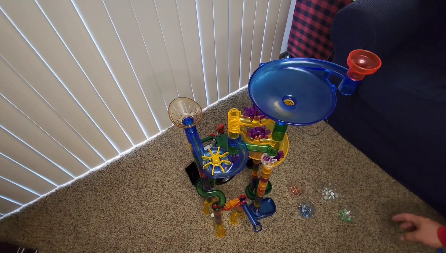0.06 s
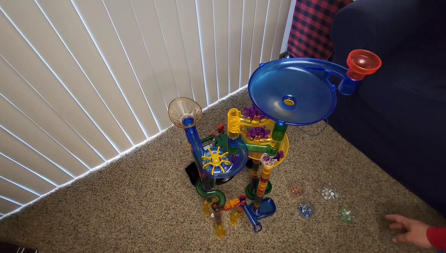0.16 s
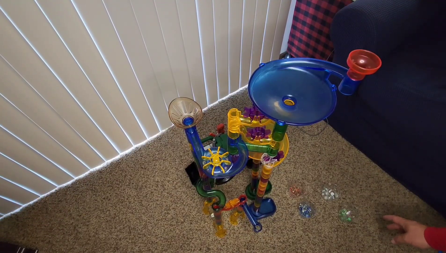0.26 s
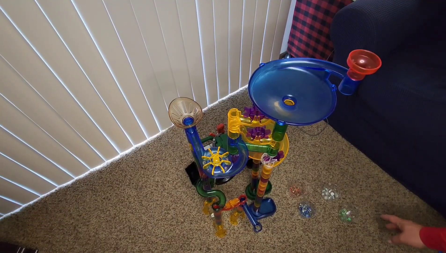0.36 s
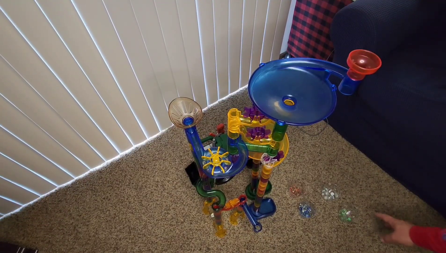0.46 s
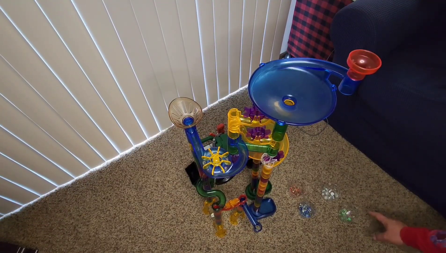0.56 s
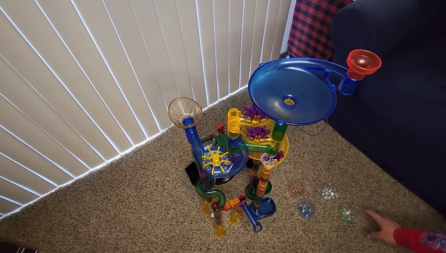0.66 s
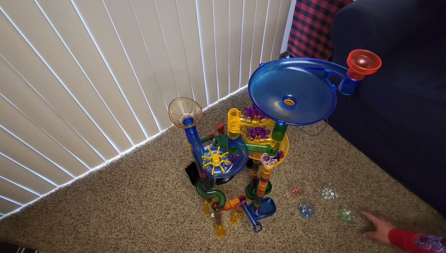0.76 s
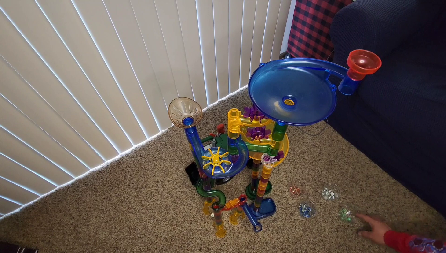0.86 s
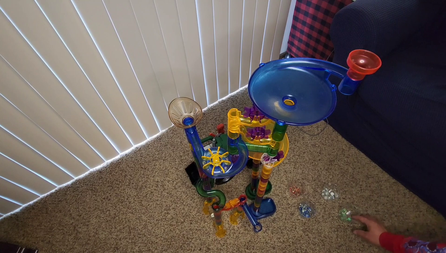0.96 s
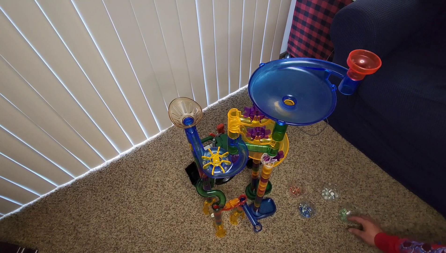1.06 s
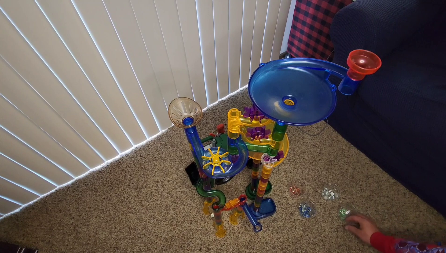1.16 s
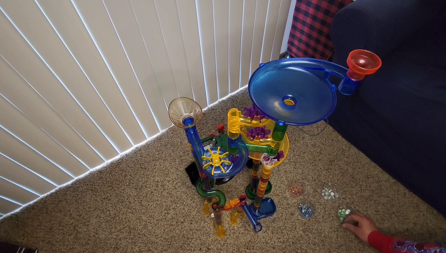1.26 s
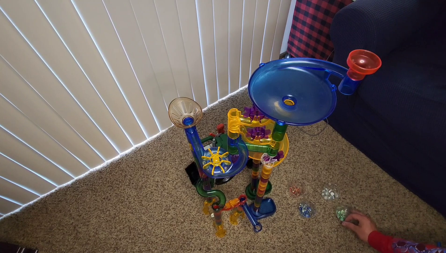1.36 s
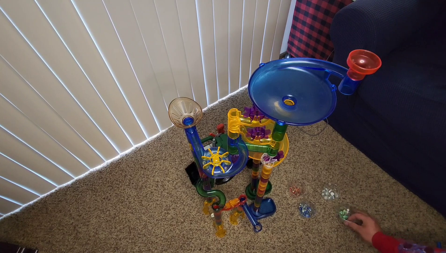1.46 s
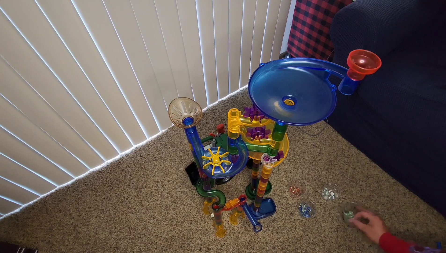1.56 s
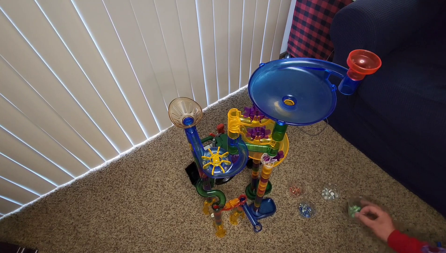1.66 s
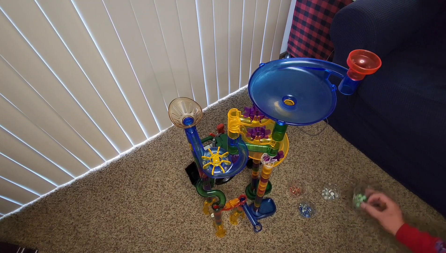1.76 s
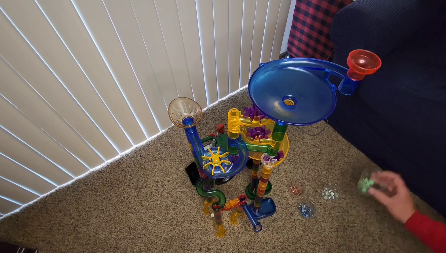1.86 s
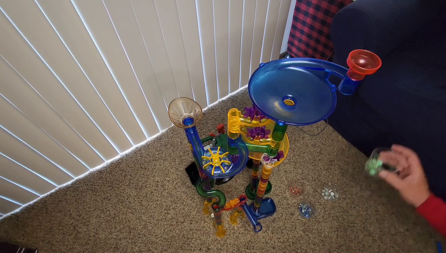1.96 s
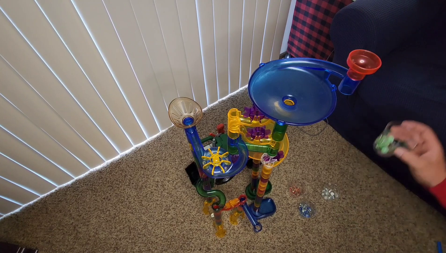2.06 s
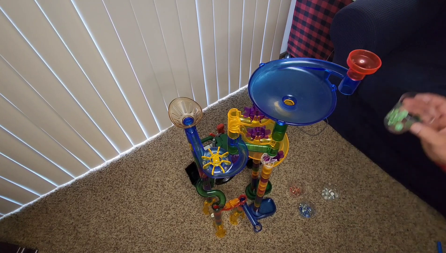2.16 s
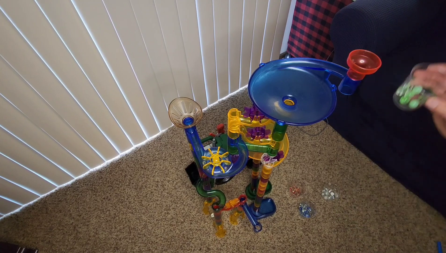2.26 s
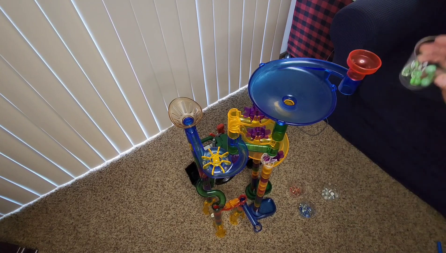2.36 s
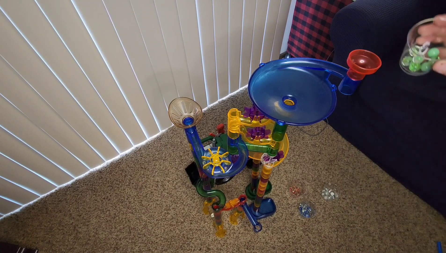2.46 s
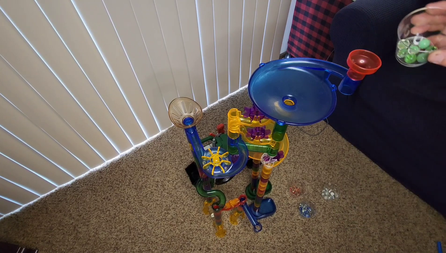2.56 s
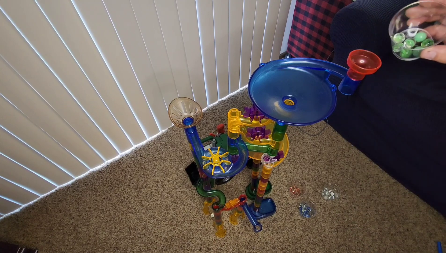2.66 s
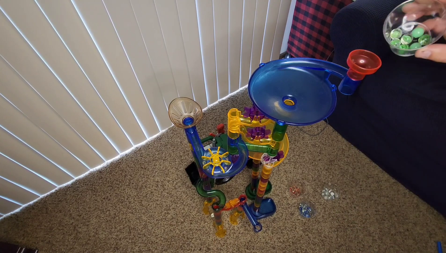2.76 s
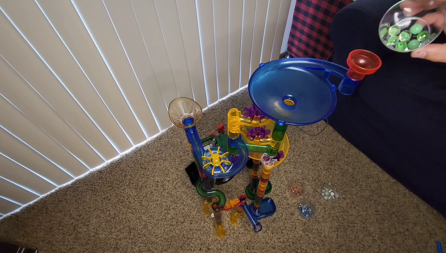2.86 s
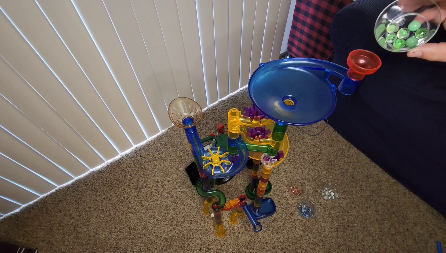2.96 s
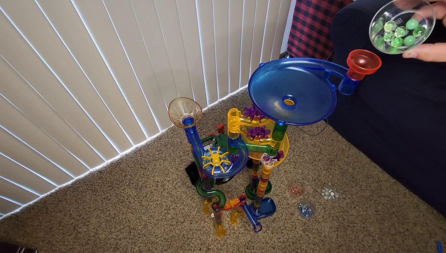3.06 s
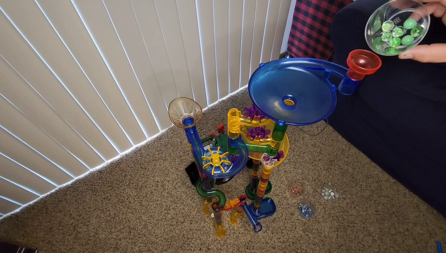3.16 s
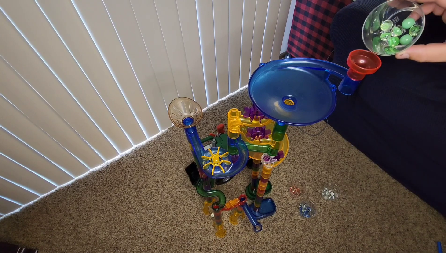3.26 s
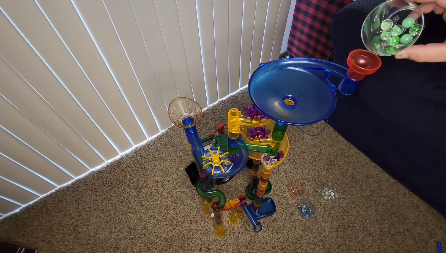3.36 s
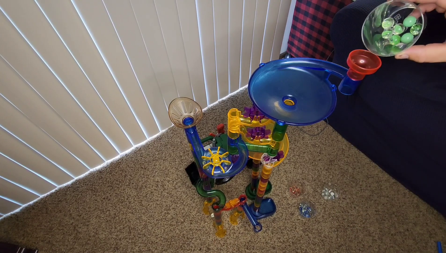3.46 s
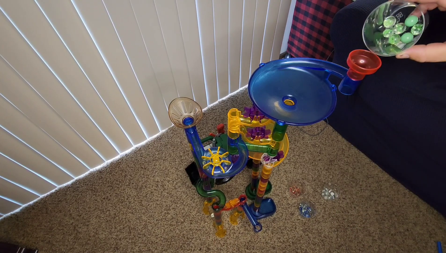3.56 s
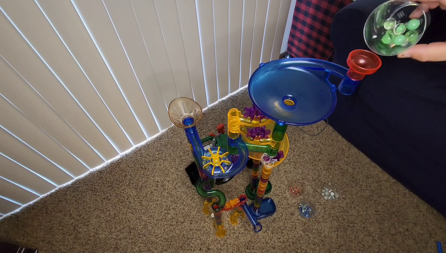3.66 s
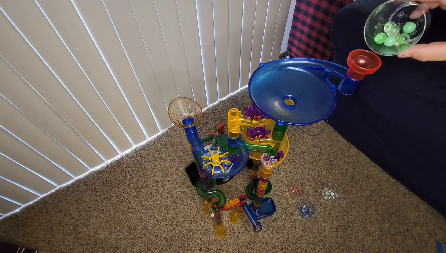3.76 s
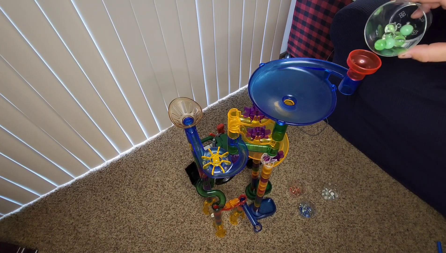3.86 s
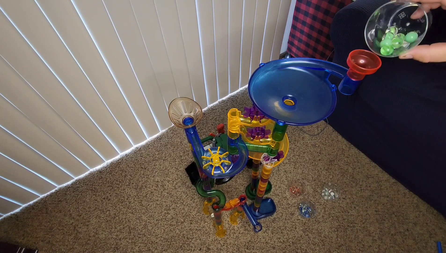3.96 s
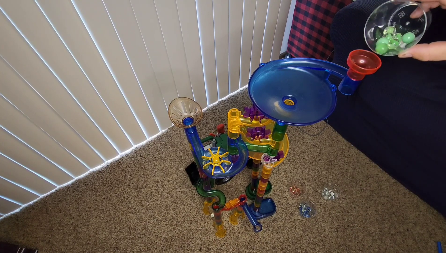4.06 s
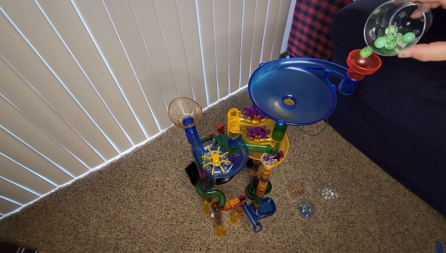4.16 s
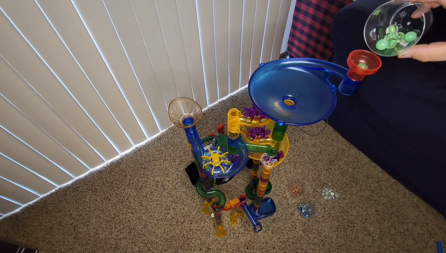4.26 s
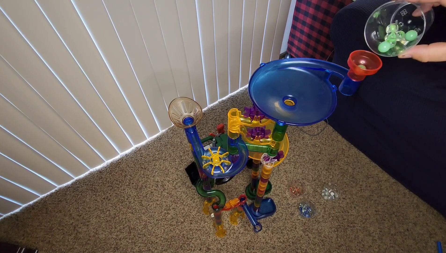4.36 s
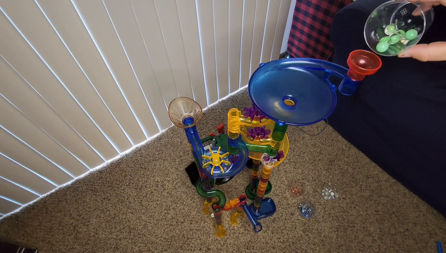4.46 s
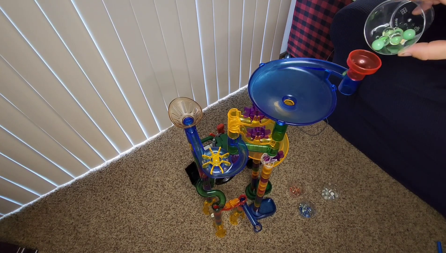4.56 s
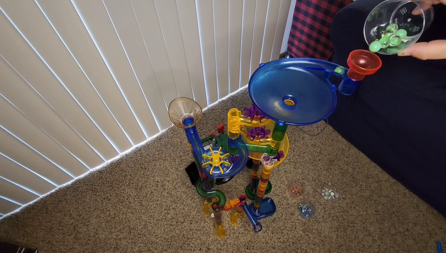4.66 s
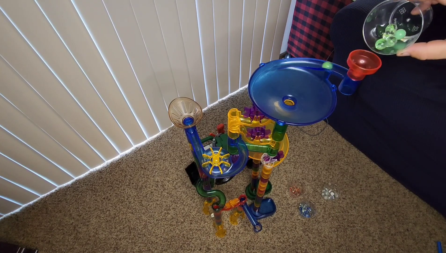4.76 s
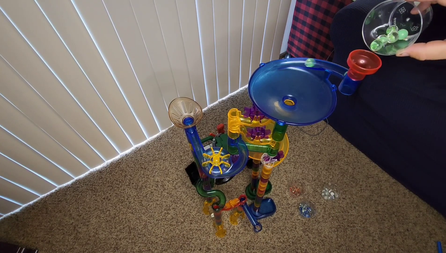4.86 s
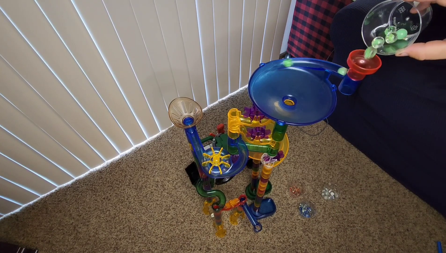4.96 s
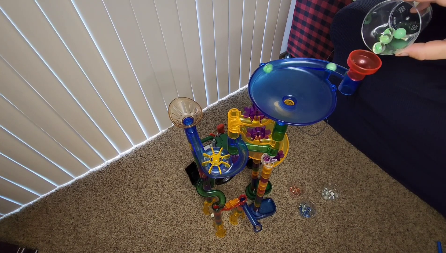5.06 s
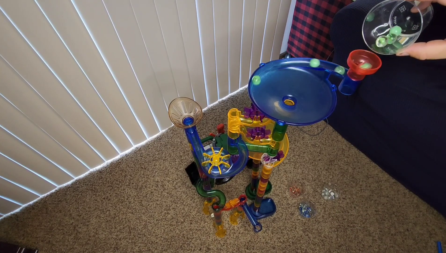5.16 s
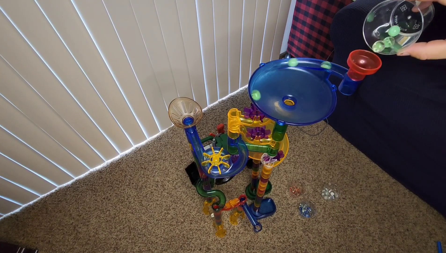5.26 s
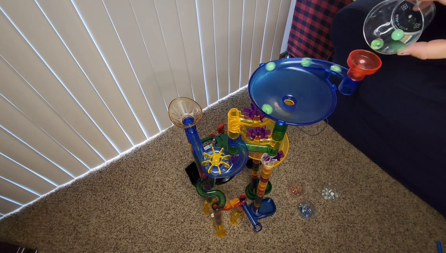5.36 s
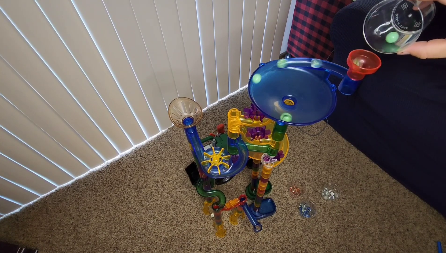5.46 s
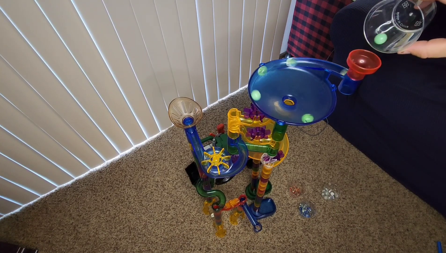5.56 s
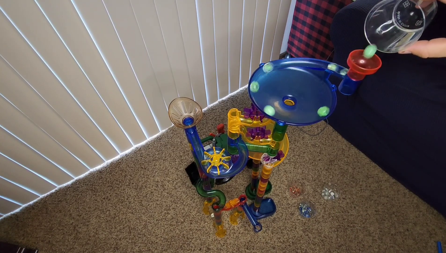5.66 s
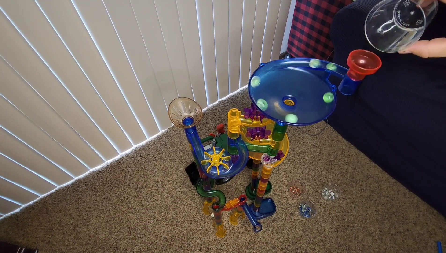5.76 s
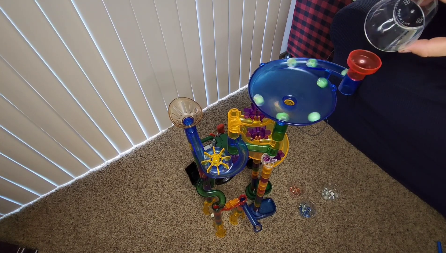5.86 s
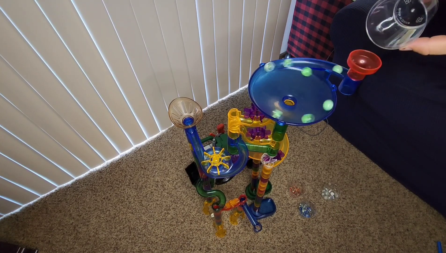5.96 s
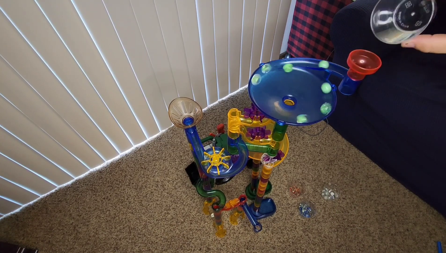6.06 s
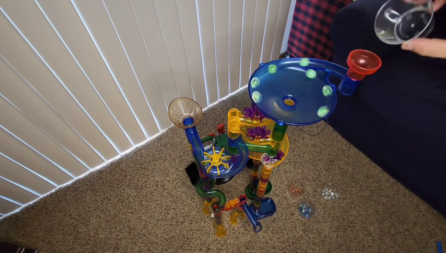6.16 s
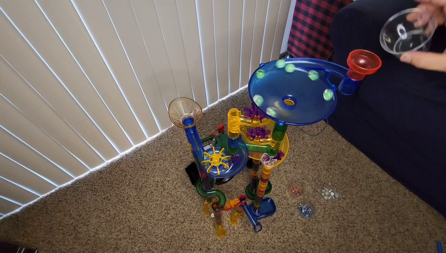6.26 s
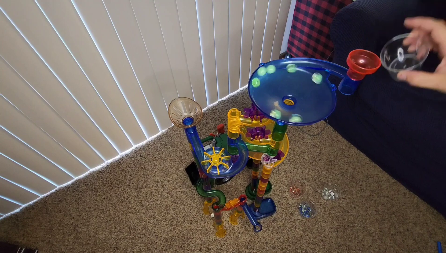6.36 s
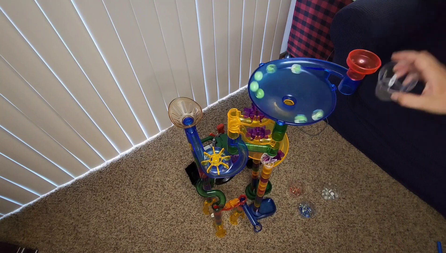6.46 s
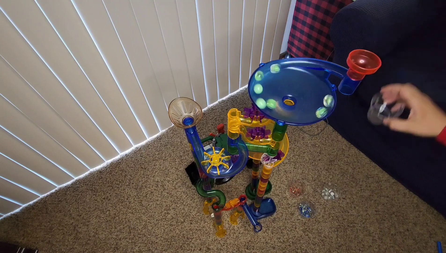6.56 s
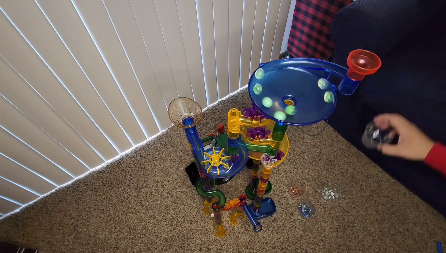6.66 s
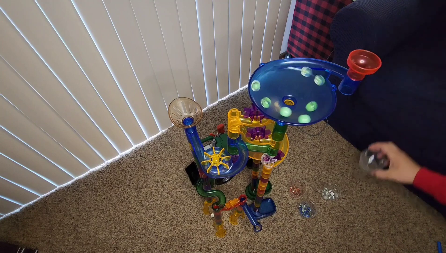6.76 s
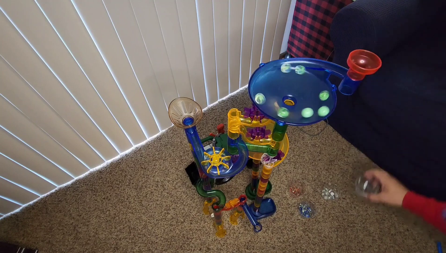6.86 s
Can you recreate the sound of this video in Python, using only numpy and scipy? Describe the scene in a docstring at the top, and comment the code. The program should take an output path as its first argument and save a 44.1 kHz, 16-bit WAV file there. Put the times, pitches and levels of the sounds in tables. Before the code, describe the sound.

For the first second, a sleeve rustles softly and there are a few dull bumps on carpet, over a low room rumble and faint hum. From about 1.2 seconds, glass marbles click lightly in a thin plastic cup, slightly to the right, growing busier around 2.5 seconds. After a pause, they slide and knock more sharply from 3.6 to 4.1 seconds as the cup tips. At 4.2 seconds they begin striking a plastic marble run, with hard knocks, clacks and glassy pings that are densest from 4.8 to 5.8 seconds. From 4.7 seconds, marbles enter a wide plastic funnel one by one, building a continuous, hollow rolling rattle with small ticks. The rolling carries on to the end at about 7 seconds, with two light knocks near 6.7. The small room adds a short tail.

```python
"""Glass marbles jostle in a thin plastic cup and are tipped into a plastic marble run.
They drop through a hopper, clatter down a chute and circle in a wide funnel.
Each blow rings the plastic's modes; rolling drives them with a stream of tiny taps.
Before the cup is lifted, a sleeve rustles, someone shifts on the floor and a marble stirs.
The small carpeted room adds a short tail, a low rumble and a faint hum."""
import sys
import numpy as np
from scipy import signal
from scipy.fft import rfft, irfft
from scipy.io import wavfile

SR = 44100
rng = np.random.default_rng(int(sys.argv[2]) if len(sys.argv) > 2 else 0)


def generate_wav(sig):
    """Save sig (samples, or channels by samples) to the path in sys.argv[1] as 16-bit PCM at SR."""
    pcm = np.round(np.clip(np.atleast_2d(sig).T, -1, 1) * 32767).astype(np.int16)
    wavfile.write(sys.argv[1], SR, pcm)


N = 305613
BLOW_SAMPLES = 8192
TIME_S, FREQ_HZ = np.arange(N) / SR, np.fft.rfftfreq(N, 1 / SR)
BLOW_TIME_S, BLOW_FREQ_HZ = np.arange(BLOW_SAMPLES) / SR, np.fft.rfftfreq(BLOW_SAMPLES, 1 / SR)
KNOCK_HZ, CLACK_HZ, PING_HZ = 1480, 2850, 5420

# soft rustles (sleeve; last row a marble shifting in the cup): t/s, length/s, level/dB
SOFT_RUSTLES = [(-.025, 0.12, -50.5), (.16, 0.033, -56), (.33, 0.13, -55), (.5, 0.26, -72),
                (.65, 0.19, -70.5), (1.04, 0.038, -59)]
# floor bumps: t/s, level/dB, f/Hz, width/oct, decay/s
FLOOR_BUMPS = [(0.138, -46, 30, 0.9, 0.088), (0.282, -57.5, 1420, 0.98, 0.043),
               (0.496, -42.5, 34.5, 0.29, 0.073)]
# knocks in the cup: t/s, relative level/dB, hardness/(dB/oct)
CUP_KNOCKS = [(1.1991, -50, -3), (1.213, -43.5, -1.7), (1.2936, -42.5, 0.5), (1.322, -46, -2.5),
              (1.333, -40.5, -.5), (1.384, -40.5, -1), (1.4742, -43.5, -1), (1.5112, -36.5, -0.5),
              (1.629, -48, -4.5), (1.66, -41, 0.1), (1.6935, -41, -2), (1.715, -38, -1),
              (1.7996, -48, -1.5), (1.883, -41.5, 1), (1.9865, -57, -1.5), (2.1998, -36.5, -0.1),
              (2.3456, -43, 0), (2.4039, -49.5, 4), (2.4119, -32.5, 1), (2.4444, -35, 1), (2.5191, -30, 1),
              (2.53, -35.5, 0), (2.5883, -33.5, 0.5), (2.6037, -29.5, -0.4), (2.6222, -31, 1.5),
              (3.6861, -34.5, 1), (3.7712, -21, 1.5), (3.7858, -42, 8), (3.8434, -36, -1),
              (3.8773, -22, 0.5), (3.917, -38.5, 8.5), (3.9895, -25, 0.1), (4.0028, -41, 2),
              (4.098, -40.5, 0.6), (4.14, -51, 5), (4.6945, -47.5, 1.6), (4.794, -49.5, 6),
              (5.007, -42, -2.5)]
# slides as the cup is lifted or tilted: t/s, length/s, relative level/dB
CUP_SLIDES = [(1.9, 0.55, -69.5), (2.19, 0.039, -44.5), (3.61, 0.054, -62.5), (3.67, 0.12, -50),
              (3.78, 0.053, -38.5), (3.96, 0.051, -41.5)]
# knocks on the run: t/s, relative level/dB, hardness/(dB/oct), ring f/Hz
TRACK_KNOCKS = [(4.2389, -40.5, 5.5, PING_HZ), (4.2454, -20, -0.3, KNOCK_HZ), (4.3776, -37, -2, KNOCK_HZ),
                (4.3930, -36.5, -2, CLACK_HZ), (4.4646, -37.5, 2, KNOCK_HZ), (4.4775, -36, -1, KNOCK_HZ),
                (4.5049, -21, 0, PING_HZ), (4.5640, -34, 1.5, CLACK_HZ), (4.5928, -37.5, 0.5, CLACK_HZ),
                (4.8213, -28.5, 1, CLACK_HZ), (4.8301, -26.5, 1, PING_HZ), (4.8413, -21, 3, CLACK_HZ),
                (4.851, -23, 0, KNOCK_HZ), (4.874, -31.5, 1, CLACK_HZ), (4.9094, -36.5, -1.5, CLACK_HZ),
                (5.0552, -42.5, -5.5, KNOCK_HZ), (5.0983, -19.5, 1.3, PING_HZ),
                (5.111, -24.5, -1, CLACK_HZ), (5.1369, -27.5, 0.9, CLACK_HZ),
                (5.2232, -26.5, 5.5, CLACK_HZ), (5.2446, -23.5, 0.9, CLACK_HZ),
                (5.2594, -22, 0.4, KNOCK_HZ), (5.28, -36, -4.5, KNOCK_HZ), (5.3038, -24, .5, PING_HZ),
                (5.3366, -31, -3, CLACK_HZ), (5.4271, -27.5, 2.5, CLACK_HZ),
                (5.4445, -24.5, -2.5, KNOCK_HZ), (5.458, -18.5, 1, PING_HZ), (5.5007, -28.5, -4, KNOCK_HZ),
                (5.5132, -28, -2.5, PING_HZ), (5.5228, -19.5, 1.8, KNOCK_HZ),
                (5.542, -26.5, -2.6, CLACK_HZ), (5.5535, -27.5, 1.3, CLACK_HZ),
                (5.5763, -28.5, 0.3, KNOCK_HZ), (5.6039, -29, 2, CLACK_HZ), (5.6396, -24.5, 1, PING_HZ),
                (5.6727, -32, -1, CLACK_HZ), (5.7754, -24, 2, CLACK_HZ), (5.7866, -23.5, 0.4, KNOCK_HZ),
                (5.803, -19, 1, PING_HZ), (5.8196, -34, -6.5, CLACK_HZ), (5.843, -26, -1, CLACK_HZ),
                (6.7077, -37.5, -2.5, KNOCK_HZ), (6.7327, -37, -1, KNOCK_HZ)]
# marbles reaching the funnel: t/s, level/dB
FUNNEL_ENTRIES = [(4.73, -43.5), (5.02, -43), (5.2, -44.5), (5.42, -41.5), (5.52, -39), (5.8, -45.5)]

# band edges of a blow: f/Hz
CUP_EDGES_HZ = [300, 2500, 6000, 16000]
TRACK_EDGES_HZ = [300, 2000, 4200, 6500, 16000]
# band shares of an ordinary blow, bass to treble: level/dB
CUP_SHARES_DB = [-5.5, -1, -2]
TRACK_SHARES_DB = [0.5, -2, -6, -9.5]

# broad spectral shapes: f/Hz, relative level/dB
RUMBLE_SPECTRUM = [(12, -40), (20, 1.5), (48, -4.5), (86, -6.5), (110, -7.5), (193, -13.5), (301, -6.5),
                   (357, -14), (422, -22), (485, -27), (660, -24.5), (780, -34), (1150, -34), (1610, -38),
                   (16000, -58)]
RUSTLE_SPECTRUM = [(150, -13), (500, 4), (900, -5.5), (1900, -4.5), (2800, -6), (5500, -4), (7600, -1),
                   (10000, -7.5), (15500, -10.5)]
CUP_SPECTRUM = [(60, -35.5), (250, -7.5), (500, -2), (900, -0.5), (1500, -2), (2200, -5.5), (3000, 3),
                (6500, 7.5), (9500, 5.5), (13000, 1.5), (16000, -2)]
UPRIGHT_SPECTRUM = [(1500, 1), (12000, -23)]
TIPPED_SPECTRUM = [(1500, 7.5), (2500, -12), (4000, -3.5), (12000, -10)]
TRACK_SPECTRUM = [(60, -14.5), (200, -16.5), (320, -5), (600, -5.5), (900, -9), (1300, 1), (2000, 1),
                  (3000, 5), (6500, 1.5), (10000, 1.5), (12500, -5.5), (16000, -15.5)]
FUNNEL_SPECTRUM = [(60, -19), (220, -14), (330, -16), (600, 0), (900, -2), (1150, 3.5), (1800, -4.5),
                   (2600, -4.5), (4000, -13.5), (5500, -20.5), (7500, -23), (11000, -41.5), (16000, -45)]
TICK_SPECTRUM = [(1400, 3.5), (2500, 5), (7000, 15), (14000, 3)]

# resonances of the plastic: f/Hz, width/Hz, level/dB above the broad shape
CUP_MODES = [(1215, 50, 5.5), (1724, 12, 7.5), (2140, 38, 4), (3576, 36, 7), (3720, 46, 5.5),
             (5370, 190, 3), (7350, 560, 7), (8180, 250, 3.5)]
UPRIGHT_MODES = [(2030, 70, 24.3), (2620, 300, 17)]
TIPPED_MODES = [(1730, 97, 14.8), (3580, 140, 14.3), (5200, 250, 7.7)]
TRACK_MODES = [(407, 13, 9.8), (440, 19, 1.2), (745, 12.6, 16), (1050, 290, 7.3), (1230, 74, 8.6),
               (1540, 54, 5.9), (1629, 17, 14.2), (1754, 25, 11.3), (2245, 23, 11.4), (2650, 180, 9.8),
               (2490, 300, 0.9), (2930, 130, 9.5), (3260, 59, 3.8), (3640, 240, 4.3), (4370, 42, 1.3),
               (4680, 71, 4.3), (5390, 100, 5.7), (14800, 810, 16.7)]
FUNNEL_MODES = [(389, 17, 12), (695, 36, 1.1), (1064, 110, 3.5), (1241, 24, 9.6), (1370, 33, 10.6),
                (1505, 57, 15.3), (1566, 24, 11), (1640, 23, 5.2), (2224, 40, 3.5), (2944, 130, 2.4)]

# room decay: f/Hz, T60/s
ROOM_T60 = [(200, 1), (800, 0.35), (2000, 0.35), (4000, 0.34), (8000, 0.36), (15000, 0.26)]
# likeness of scattered sound at the two ears: f/Hz, correlation
EAR_CORRELATION = [(40, 0.98), (200, 0.88), (900, 0.75), (1500, 0.37), (2100, 0.47), (2900, 0.11),
                   (3900, 0.3), (5000, -0.012), (8000, 0.71), (15000, 1)]
# left microphone port over right: f/Hz, level/dB
PORT_BALANCE = [(600, 0.81), (1200, 1.7), (2800, 0.3), (5000, -1.1), (10000, 0.3)]


def amp(db):
    """Decibels to gain."""
    return 10 ** (np.asarray(db) / 20)


def unit_rms(x):
    """Scales to rms 1."""
    return x / np.sqrt(np.mean(x ** 2) + 1e-20)


def curve(points, hz):
    """Table interpolated over log frequency."""
    points_hz, values = np.transpose(points)
    return np.interp(np.log(hz + 1), np.log(points_hz), values)


def add(mix, start_s, sound):
    """Mixes in a stereo sound."""
    part = mix[:, max(round(start_s * SR), 0):][:, :sound.shape[1]]
    part += sound[:, :part.shape[1]]


def min_phase(gain):
    """Minimum-phase spectrum: rings after a blow, never before."""
    cepstrum = irfft(np.log(np.maximum(gain, 1e-9)))
    half = len(cepstrum) // 2
    cepstrum[1:half] *= 2
    cepstrum[half + 1:] = 0
    return np.exp(rfft(cepstrum))


def diffuse(samples):
    """Stereo white noise arriving from all sides."""
    left, other = rfft(rng.standard_normal((2, samples)))
    correlation = np.clip(curve(EAR_CORRELATION, np.fft.rfftfreq(samples, 1 / SR)), -1, 1)
    right = correlation * left + np.sqrt(1 - correlation ** 2) * other
    return irfft(np.array([left, right]), samples)


def shaped_noise(spectrum):
    """Coloured diffuse noise, rms 1."""
    return unit_rms(irfft(rfft(diffuse(N)) * amp(curve(spectrum, FREQ_HZ)), N))


def swell(start_s, length_s, rise_s, fade_s):
    """Envelope of one movement: rise, hold, fade."""
    age_s = np.maximum(TIME_S - start_s, 0)
    return (1 - np.exp(-age_s / rise_s)) ** 2 * np.exp(-np.maximum(age_s - length_s, 0) / fade_s)


def movements(rows, rise_s, fade_s):
    """Envelope of several movements; powers add."""
    return np.sqrt(sum((amp(db) * swell(start_s, length_s, rise_s, fade_s)) ** 2
                       for start_s, length_s, db in rows))


def background(rumble_db=-57, hum_hz=118, hum_db=-63.5):
    """Low room rumble and faint mains hum."""
    hum = np.sqrt(2) * np.sin(2 * np.pi * hum_hz * TIME_S)
    return amp(rumble_db) * shaped_noise(RUMBLE_SPECTRUM) + amp(hum_db) * hum


def soft_rustles():
    """Sleeve brushes, then a brief hiss of a marble shifting in the cup."""
    return shaped_noise(RUSTLE_SPECTRUM) * movements(SOFT_RUSTLES, rise_s=0.018, fade_s=0.031)


def floor_bumps():
    """Dull, quickly damped pushes on the carpet."""
    out = np.zeros((2, N))
    samples = SR // 2
    age_s, hz = np.arange(samples) / SR, np.fft.rfftfreq(samples, 1 / SR)
    for start_s, db, centre_hz, width_oct, decay_s in FLOOR_BUMPS:
        band = np.exp(-(np.log2((hz + 1) / centre_hz) / width_oct) ** 2 / 2)
        push = irfft(rfft(diffuse(samples)) * band, samples)
        envelope = np.exp(-age_s / decay_s) * (1 - np.exp(-4 * age_s / decay_s))
        add(out, start_s, amp(db) * unit_rms(push * envelope) * np.sqrt(decay_s * SR / samples))
    return out


def shell(spectrum, modes, hz, spread_db=0):
    """Gain of a plastic shell; the struck spot favours modes at random by spread_db."""
    power = 1
    for mode_hz, width_hz, db in modes:
        peak = amp(db + spread_db * rng.standard_normal())
        power += peak ** 2 / (1 + (2 * (hz - mode_hz) / width_hz) ** 2)
    return amp(curve(spectrum, hz)) * np.sqrt(power)


def octaves_above(edges_hz, hz):
    """Band centres in octaves above hz."""
    return np.log2(np.sqrt(np.multiply(edges_hz[:-1], edges_hz[1:])) / hz)


def blow_levels(db, hardness_db_per_oct, edges_hz, shares_db, pivot_hz=3000):
    """Band levels of a blow: harder, shorter contact tilts them to the treble."""
    return db + np.array(shares_db) + hardness_db_per_oct * octaves_above(edges_hz, pivot_hz)


def knock(levels_db, edges_hz, spectrum, modes, scatter_db, scatter_s, bounce_db, bounce_s, lag_samples):
    """Glass on plastic: a click, small rebounds, scatter through the shell and off nearby things."""
    hz = BLOW_FREQ_HZ
    clicks = np.zeros(BLOW_SAMPLES)
    rebounds_s = rng.uniform(0.003, bounce_s, size=4)
    rebound_gains = amp(bounce_db) * rng.standard_normal(size=4) * np.exp(-rebounds_s / bounce_s)
    clicks[(rebounds_s * SR).astype(int)] = rebound_gains
    clicks[0] = 1
    late_left = np.roll(clicks, max(round(lag_samples + rng.standard_normal()), 0))
    scatter = diffuse(BLOW_SAMPLES) * np.exp(-BLOW_TIME_S / scatter_s) * np.sqrt(2 / (scatter_s * SR))
    drive = np.array([late_left, clicks]) + amp(scatter_db) * scatter
    body = shell(spectrum, modes, hz, spread_db=2)
    delay_s = 0.0011 * np.exp(-hz / 9000)  # bending waves: treble arrives first
    ringing = rfft(drive) * min_phase(body) * np.exp(-2j * np.pi * np.cumsum(delay_s) * hz[1])
    # contact sets the band levels of the first 5 ms
    attack_samples = SR // 200
    attack = rfft(irfft(ringing)[:, :attack_samples], BLOW_SAMPLES)
    power = (abs(attack) ** 2).mean(0) * 2 / (BLOW_SAMPLES * attack_samples)
    contact = [(np.sqrt(low * high), db - 10 * np.log10(power[(hz >= low) & (hz < high)].sum()))
               for low, high, db in zip(edges_hz, edges_hz[1:], levels_db)]
    return irfft(ringing * min_phase(amp(curve(contact, hz))))


def cup_knocks():
    """Marbles click against each other and the thin cup."""
    out = np.zeros((2, N))
    for start_s, db, hardness in CUP_KNOCKS:
        levels_db = blow_levels(db, hardness, CUP_EDGES_HZ, CUP_SHARES_DB)
        slither_db = np.clip(-0.4 * (levels_db[-1] + 34.5), -4, 5)  # gentle knocks slither more
        blow = knock(levels_db, CUP_EDGES_HZ, CUP_SPECTRUM, CUP_MODES, scatter_db=3.5 + slither_db,
                     scatter_s=0.019, bounce_db=-8, bounce_s=0.025, lag_samples=10)
        add(out, start_s, blow)
    return out


def cup_roll(tipped_at_s=3.2, nudge_db=-3.5, grain_samples=64):
    """Knocks and tilts roll the marbles over the cup's bottom or, once tipped, its side."""
    grain_db = 3 * np.repeat(rng.exponential(size=N // grain_samples + 1), grain_samples)[:N]
    grit = unit_rms(diffuse(N) * amp(grain_db))
    wall = rfft(grit) * shell(CUP_SPECTRUM, CUP_MODES, FREQ_HZ)
    upright = unit_rms(irfft(wall * shell(UPRIGHT_SPECTRUM, UPRIGHT_MODES, FREQ_HZ), N))
    tipped = unit_rms(irfft(wall * shell(TIPPED_SPECTRUM, TIPPED_MODES, FREQ_HZ), N))
    nudges = [(start_s, 0, db + nudge_db) for start_s, db, _ in CUP_KNOCKS]
    nudged = movements(nudges, rise_s=0.015, fade_s=0.02)
    tilted = movements(CUP_SLIDES, rise_s=0.0091, fade_s=0.027)
    return np.where(TIME_S < tipped_at_s, upright, tipped) * np.hypot(nudged, tilted)


def track_knocks(spot_db=7.5, spot_width_oct=0.42, ring_q=11.3, ring_db=14):
    """Marbles strike hopper, chute and funnel; each spot rings as a low knock, clack or glassy ping."""
    out = np.zeros((2, N))
    for start_s, db, hardness, ring_hz in TRACK_KNOCKS:
        lift_db = spot_db * np.exp(-(octaves_above(TRACK_EDGES_HZ, ring_hz) / spot_width_oct) ** 2 / 2)
        levels_db = blow_levels(db, hardness, TRACK_EDGES_HZ, TRACK_SHARES_DB) + lift_db
        modes = TRACK_MODES + [(ring_hz, ring_hz / ring_q, ring_db)]
        slither_db = np.clip(-0.2 * (db + 27.5), -2, 2)  # hard blows are drier
        blow = knock(levels_db, TRACK_EDGES_HZ, TRACK_SPECTRUM, modes, scatter_db=2.3 + slither_db,
                     scatter_s=0.0085, bounce_db=-12.5, bounce_s=0.032, lag_samples=2.6)
        add(out, start_s, blow)
    return out


def funnel_roll(taps_per_s=900, ticks_per_s=22, tick_db=-19, scatter_s=0.0033, slowing_db_per_s=1):
    """Circling marbles tap over tiny bumps and ring the funnel; occasional skips tick brighter."""
    body = shell(FUNNEL_SPECTRUM, FUNNEL_MODES, BLOW_FREQ_HZ)
    bright_body = body * amp(curve(TICK_SPECTRUM, BLOW_FREQ_HZ))
    out = np.zeros((2, N))
    for start_s, db in FUNNEL_ENTRIES:
        path = rfft(diffuse(BLOW_SAMPLES) * np.exp(-BLOW_TIME_S / scatter_s))
        kicks = amp(2.5 * np.minimum(rng.exponential(size=N), 4)) * rng.choice([-1, 1], N)
        draw_per_s = rng.random(N) * SR * len(FUNNEL_ENTRIES)  # all marbles share the rates
        run_up = swell(start_s, np.inf, rise_s=0.039, fade_s=1)
        envelope = run_up * amp(db - slowing_db_per_s * (TIME_S - start_s))
        for rate_per_s, colour, gain in (taps_per_s, body, 1), (ticks_per_s, bright_body, amp(tick_db)):
            taps = kicks * (draw_per_s < rate_per_s)
            ringing = signal.oaconvolve(taps[None], irfft(path * min_phase(colour)), axes=1)[:, :N]
            out += gain * envelope * np.array([unit_rms(channel) for channel in ringing])
    return out


def room_tail(x, build_s=0.004):
    """Small-room reverberation: builds in a few ms, dies soonest in the treble."""
    hz, age_s, frames = signal.stft(diffuse(SR * 2 // 3), SR, nperseg=256)
    decay = 1000 ** (-age_s / curve(ROOM_T60, hz)[:, None])
    tail = signal.istft(frames * decay, SR, nperseg=256)[1]
    tail *= 1 - np.exp(-(np.arange(tail.shape[1]) / SR / build_s) ** 2)
    return signal.fftconvolve(x, tail / np.linalg.norm(tail[0]), axes=1)[:, :N]


def scene():
    """Cup (to the right), run and funnel with room tail, over the quiet sounds."""
    jostle = (amp(-1.92) * cup_knocks() + cup_roll()) * amp([[-1.5], [1.3]])
    clatter = track_knocks() * amp([[-0.3], [0.1]])
    circling = funnel_roll()
    tail = room_tail(amp(-9.5) * jostle + amp(-7.5) * clatter + amp(-6.5) * circling)
    return jostle + clatter + circling + tail + soft_rustles() + floor_bumps() + background()


def record(dry, cutoff_hz=16150):
    """Two microphone ports of slightly unequal colour, then a low-pass."""
    balance_db = curve(PORT_BALANCE, FREQ_HZ)
    ports = irfft(rfft(dry) * amp(np.array([balance_db, -balance_db]) / 2), N)
    lowpass = signal.firwin(401, cutoff_hz, window=("kaiser", 9), fs=SR)
    return signal.oaconvolve(ports, lowpass[None], "same")


dry = scene()
out = record(dry)
generate_wav(out)
```